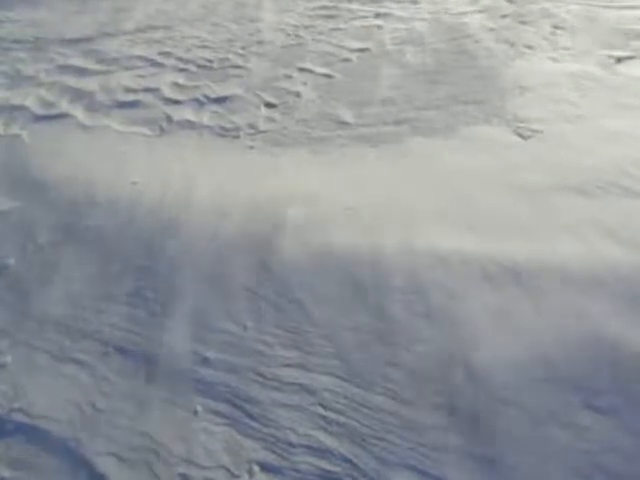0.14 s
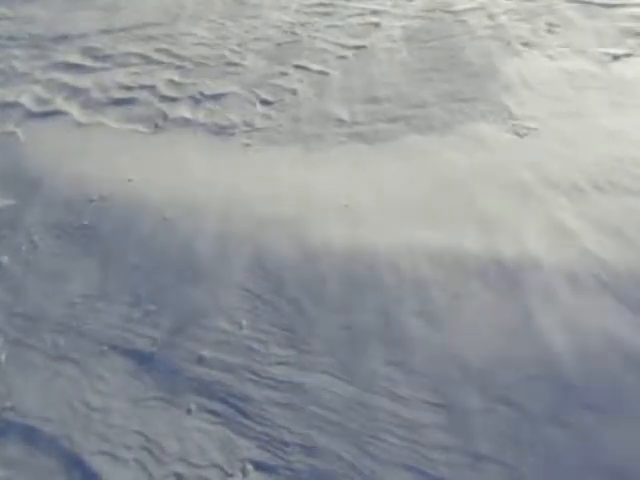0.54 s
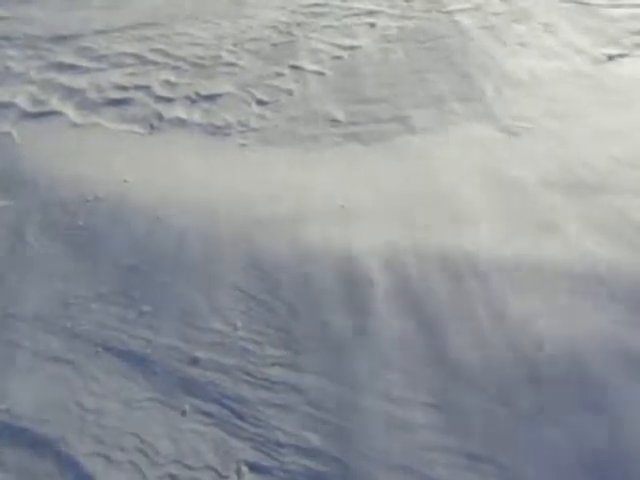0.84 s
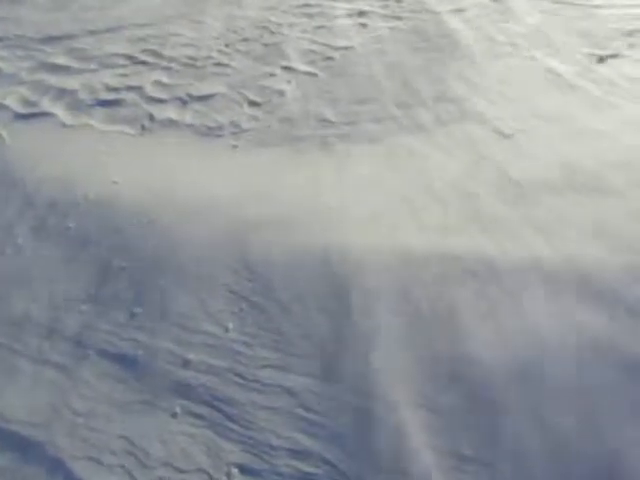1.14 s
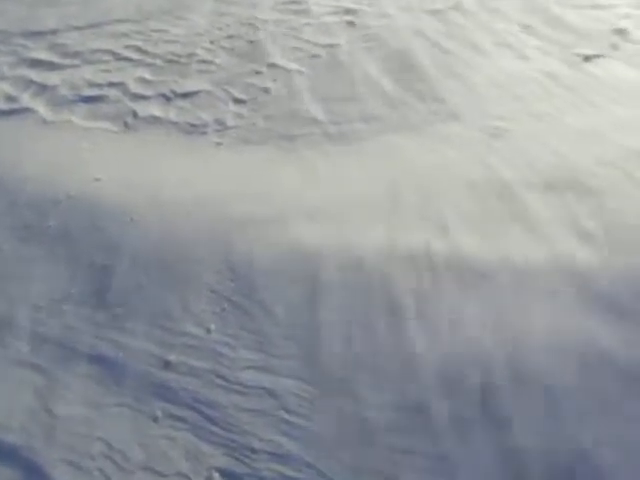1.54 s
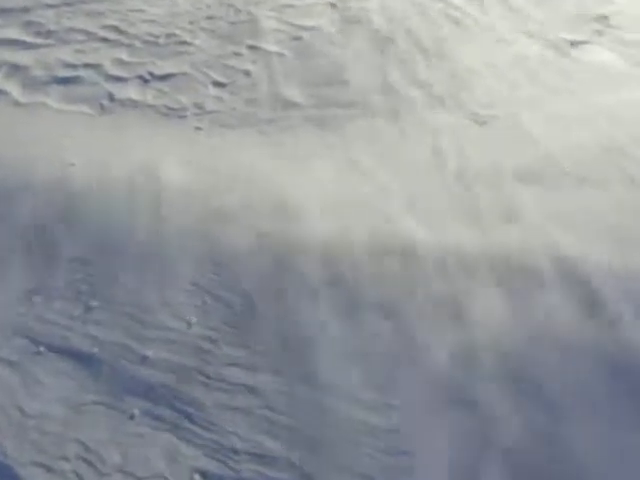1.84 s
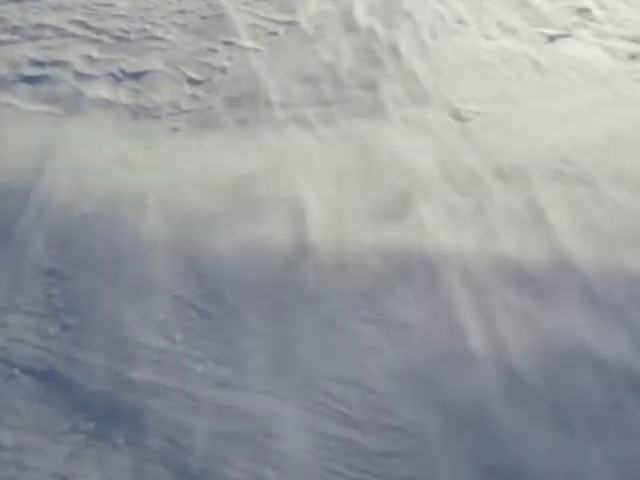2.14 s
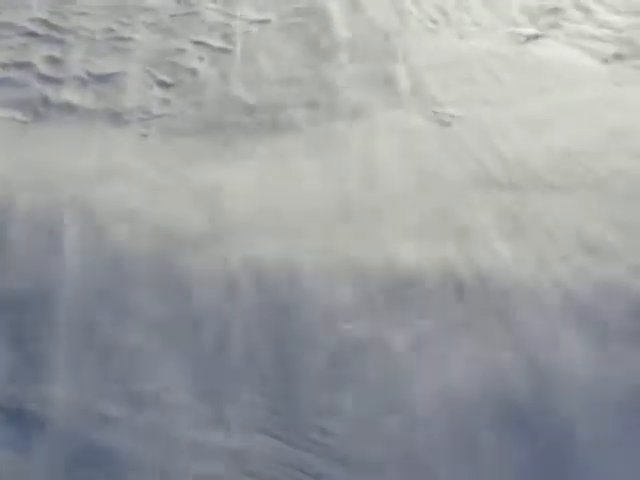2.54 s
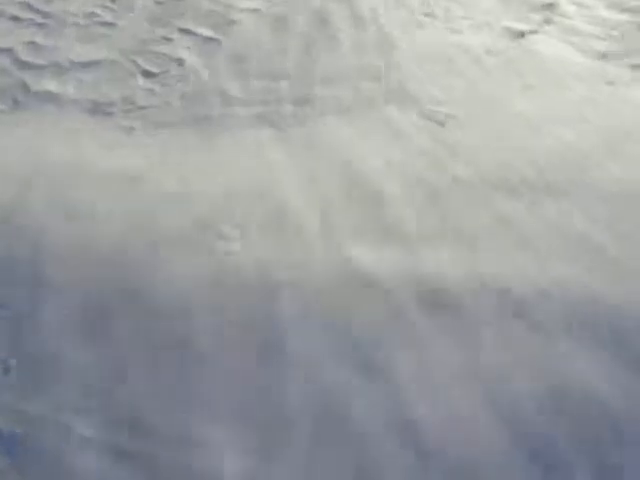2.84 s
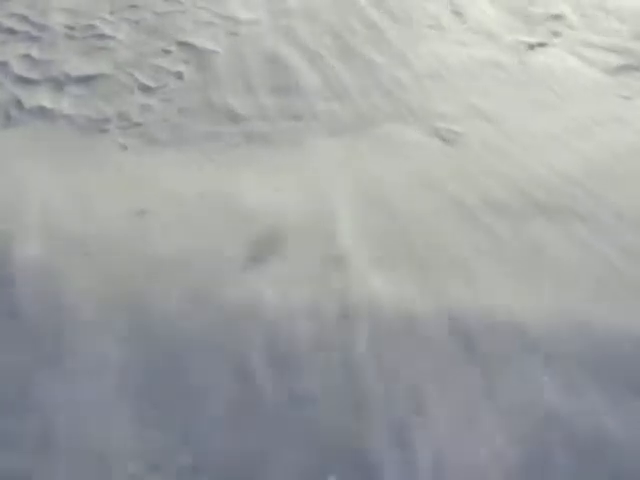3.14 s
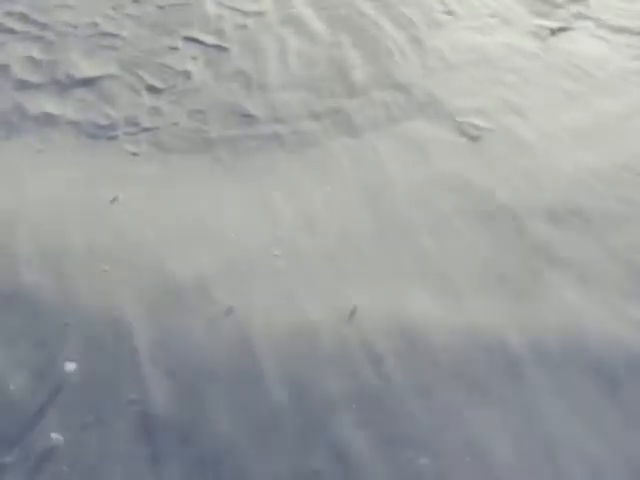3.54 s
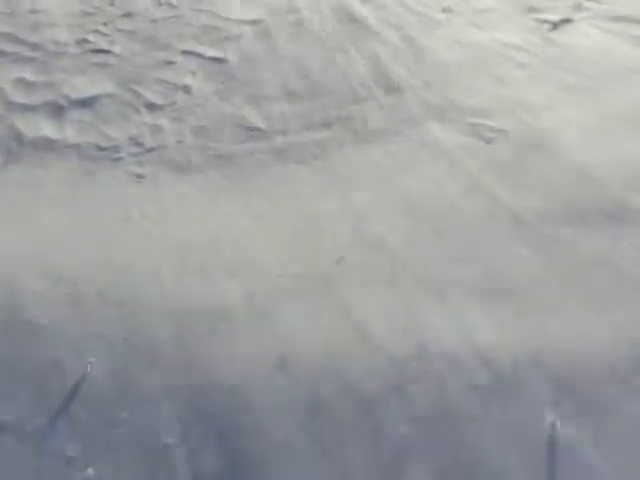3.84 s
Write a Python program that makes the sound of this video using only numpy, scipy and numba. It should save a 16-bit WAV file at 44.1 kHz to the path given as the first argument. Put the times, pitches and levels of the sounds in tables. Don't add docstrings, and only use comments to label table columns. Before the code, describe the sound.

Wind strikes a small bare microphone on an open snowfield. From 0 to 1.3 seconds, short low flutters and thumps come unevenly, with brief gaps. From about 1.35 to 1.8 it sinks to weak puffs and faint snow hiss. At 1.83 hard blasts erupt, strongest around 2.26, with overloaded snaps and ticks; brief dips near 2.08 and 2.55, then dense, rasping, rumbling buffeting from 2.8 until the end at 4.

```python
import sys
import numpy as np
from scipy import signal
from scipy.fft import rfft, irfft
from scipy.io import wavfile
from scipy.ndimage import uniform_filter1d
from numba import njit

SR = 44100
rng = np.random.default_rng(int(sys.argv[2]) if len(sys.argv) > 2 else 0)


def decibels_to_gain(level_db):
    exponent = np.asarray(level_db, float) / 20
    return 10 ** exponent


def master_out(mix):
    frames = np.transpose(np.atleast_2d(mix))
    ceiling = np.clip(frames, -1, 1)
    pcm = np.round(ceiling * 32767).astype(np.int16)
    wavfile.write(sys.argv[1], SR, pcm)


N = 176400
MIDDLE_PUSH_DB = -19.5


def rms_one(x):
    return x / np.sqrt(np.mean(x ** 2) + 1e-20)


def drift(rate_hz):
    r = np.exp(-2 * np.pi * rate_hz / SR)
    settle = 8000
    wander = signal.lfilter([1], [1, -2 * r, r * r], rng.standard_normal(N + settle))
    return rms_one(wander[settle:])


def cut(x, hz, kind, order=1):
    return signal.sosfilt(signal.butter(order, hz, kind, fs=SR, output="sos"), x)


@njit
def moving_pole(x, share):
    y, state = np.empty_like(x), 0.
    for i in range(len(x)):
        state += share[i] * (x[i] - state)
        y[i] = state
    return y


def pole_share(corner_hz):
    return 1 - np.exp(-2 * np.pi * corner_hz / SR)


def push():
    # time_s, level_db
    steady_wind = [(0, -26.5), (.12, -27), (.3, -32.5), (.5, -77.5), (.73, -30.5), (1.1, -30.5),
                   (1.22, -27.5), (1.45, -40), (1.63, -38), (1.82, -42), (2.0, -34), (2.42, -26),
                   (2.6, -25.5), (2.81, -29), (3.05, -30), (3.32, -21), (3.65, -22), (4.0, -22.5)]
    # start_s, peak_db, length_s, brightness_ratio
    eddies = [(0.03, -17, 0.009, 0.9), (0.079, -11, 0.018, 1), (0.114, -11, 0.009, 0.88),
              (0.155, -12, 0.015, 1), (0.178, -9.5, 0.008, 0.7), (0.197, -18, 0.008, 0.7),
              (0.241, -10, 0.013, 1), (0.278, -16, 0.008, 0.82), (0.315, -25, 0.011, 1.45),
              (0.378, -25, 0.047, 1.1), (0.466, -19.5, 0.014, 0.83), (0.504, -14, 0.02, 0.75),
              (0.541, -19, 0.015, 0.8), (0.559, -7, 0.018, 0.8), (0.58, -8, 0.02, 0.99),
              (0.612, -16, 0.01, 0.8), (0.643, -18, 0.006, 1), (0.662, -20, 0.015, 0.7),
              (0.709, -23, 0.006, 0.8), (0.728, -17, 0.018, 0.8), (0.758, -19, 0.008, 1.1),
              (0.797, -10, 0.035, 0.8), (0.845, -15, 0.018, 1.02), (0.869, -13, 0.016, 0.9),
              (0.902, -10.5, 0.018, 0.7), (0.929, -15.5, 0.036, 0.95), (1.011, -6, 0.0067, 0.47),
              (1.129, -14, 0.041, 0.56), (1.213, -7, 0.013, 0.59), (1.226, -8, 0.027, 0.8),
              (1.286, -14, 0.013, 0.7), (1.264, -12, 0.011, 1.1), (1.348, -24, 0.022, 0.9),
              (1.474, -23, 0.022, 0.9), (1.574, -24, 0.012, 0.9), (1.636, -20, 0.018, 0.6),
              (1.754, -22, 0.026, 0.6),
              (1.83, -10, 0.017, 0.75), (1.842, -4.5, 0.024, 0.7), (1.875, -4.5, 0.03, 0.83),
                     (1.891, -4.5, 0.0071, 2.54), (1.921, -11.5, 0.022, 1.5), (1.934, -6, 0.0094, 0.88),
                     (1.968, -20.5, 0.021, 1.96), (2.002, -20, 0.03, 1.53), (2.132, -15, 0.0039, 0.85),
                     (2.164, -17, 0.013, 1.1), (2.184, -6, 0.0067, 0.64), (2.208, -11.5, 0.0081, 0.39),
                     (2.259, 1.5, 0.014, 0.3), (2.276, -3.5, 0.016, 1.16), (2.296, -3, 0.013, 0.32),
                     (2.318, -5, 0.0057, 1.16), (2.376, -15, 0.0079, 1.3), (2.421, -9, 0.012, 0.86),
                     (2.463, -3, 0.0066, 0.57), (2.476, -12.5, 0.0074, 1), (2.512, -56, 0.026, 6.1),
                     (2.595, -20, 0.0056, 0.58), (2.611, -6.5, 0.0088, 0.53), (2.639, -3.5, 0.0025, 0.57),
                     (2.682, -12.5, 0.01, 0.44), (2.708, -3.5, 0.011, 0.57), (2.797, -11.5, 0.023, 1.03),
                     (2.82, -10.5, 0.014, 0.65), (2.855, -7, 0.025, 0.71), (2.888, -7.5, 0.012, 0.75),
                     (2.905, -6.5, 0.024, 0.51), (2.939, -5, 0.018, 0.84), (2.967, -11.5, 0.011, 0.87),
                     (2.994, -1.5, 0.005, 0.57),
              (3.047, -2.5, 0.013, 0.48), (3.097, -7, 0.016, 0.29), (3.119, -7, 0.0062, 1.03),
                   (3.132, -5, 0.0049, 0.36), (3.173, -9.5, 0.02, 0.51), (3.203, -6, 0.0092, 0.38),
                   (3.216, -14, 0.015, 0.73), (3.25, -9, 0.011, 0.41), (3.267, -4.5, 0.016, 0.67),
                   (3.301, -4.5, 0.013, 0.35), (3.367, -8.5, 0.017, 0.52), (3.395, -13.5, 0.033, 1.7),
                   (3.419, 1, 0.01, 0.43), (3.434, -29, 0.021, 1.9), (3.444, -12, 0.011, 0.96),
                   (3.474, -8.5, 0.011, 0.54), (3.506, -9, 0.0067, 1.26), (3.537, -14, 0.017, 1.9),
                   (3.55, -8, 0.016, 1.01), (3.578, -18, 0.0054, 3.3), (3.593, -6, 0.013, 1.22),
                   (3.615, -5.5, 0.013, 0.59), (3.656, -7.5, 0.018, 0.42), (3.695, -13, 0.015, 1.05),
                   (3.72, -10, 0.013, 0.57), (3.741, -8.5, 0.0095, 0.66), (3.773, -20.5, 0.006, 0.76),
                   (3.794, -12, 0.0053, 0.83), (3.803, -8, 0.0084, 0.71), (3.811, -6, 0.0089, 0.66),
                   (3.864, -13, 0.014, 0.31), (3.888, -8.5, 0.0044, 1.13), (3.902, -5.5, 0.0088, 0.4),
                   (3.921, -13.5, 0.0064, 1.63), (3.98, -2.5, 0.012, 0.62)]
    # middle_s, depth_db, half_length_s
    calms = [(1.089, 20, 0.012), (2.077, 17, 0.0077), (2.562, 23, 0.012), (2.662, 8, 0.024),
             (2.733, 20.5, 0.012), (3.29, 12, 0.0087), (3.497, 20, 0.019), (3.636, 8.5, 0.016),
             (3.788, 13.5, 0.0035), (3.831, 10, 0.0083), (3.853, 20, 0.011), (3.887, 12, 0.0093)]
    # rate_hz, spread_db
    unevenness = [
        (15, .6),
        (50, 1.5),
        (190, 4.0),
    ]
    crest_db = 5.5
    lump_top_db = 4

    t = np.arange(N) / SR
    calm_db = sum(depth_db * np.exp(-((t - s) / half) ** 2) for s, depth_db, half in calms)
    power = decibels_to_gain(2 * (np.interp(t, *np.transpose(steady_wind)) - calm_db))
    bright = np.zeros(N)
    for s, db, length, sharp in eddies:
        near = slice(int(s * SR), int((s + 4 * length) * SR) + 2)
        age = np.maximum(t[near] - s, 0)
        rise_s = .001 + .1 * length
        rise = (1 - np.exp(-age / rise_s)) ** 2
        burst = decibels_to_gain(2 * (db - crest_db)) * rise * np.exp(-(age / length) ** 3)
        power[near] += burst
        bright[near] += burst * 20 * np.log10(max(sharp, .1))

    lumps = sum(spread_db * drift(rate_hz) for rate_hz, spread_db in unevenness)
    lumps = np.where(lumps > 0, lump_top_db * np.tanh(lumps / lump_top_db), lumps)
    return 10 * np.log10(power), bright / power, lumps


def flutter(push_db, bright_db):
    extra_db = push_db - MIDDLE_PUSH_DB
    corner_hz = np.clip(490 * decibels_to_gain(.48 * extra_db + bright_db), 40, 5000)
    stages = [rng.standard_normal(N) * np.sqrt(SR / corner_hz / 2)]
    for ratio in (1, 4.1, 4.1, 4.27, 4.27):
        stages.append(moving_pole(stages[-1], pole_share(ratio * corner_hz)))

    gale_db = uniform_filter1d(push_db, size=int(.8 * SR)) - MIDDLE_PUSH_DB
    rasp_db = np.minimum(-3 + gale_db + .27 * extra_db + bright_db, -1)
    x = stages[5] + decibels_to_gain(rasp_db) * stages[3]

    evenness, even_s = .6, .008
    nearby_power = np.abs(uniform_filter1d(x ** 2, size=int(even_s * SR)) + 0.0033)
    x = decibels_to_gain(push_db) * x / nearby_power ** (evenness / 2)

    skirt = pole_share(8 * corner_hz * decibels_to_gain(.9 * gale_db))
    for _ in range(3):
        x = moving_pole(x, skirt)
    return x


def cracks():
    # start_s, peak_db, cycle_s
    snaps = [(0.5595, -1, 0.0016), (1.239, 5, 0.0012), (1.245, -1, 0.0012), (1.8775, 2, 0.0014),
             (1.891, 3, 0.0011), (2.275, 3, 0.0016), (2.712, 6, 0.0008), (2.907, 2, 0.0011),
             (2.947, 1, 0.001), (2.997, -1, 0.0014), (3.051, -1, 0.0012), (3.396, 0, 0.0012),
             (3.839, -5, 0.002), (3.905, -1, 0.0016)]
    t, out = np.arange(N) / SR, np.zeros(N)
    for s, db, cycle in snaps:
        near = slice(int(s * SR), int((s + 3 * cycle) * SR))
        age = np.maximum(t[near] - s, 0) / cycle
        swell = 8.4 * age ** 2 * np.exp(-(1.5 * age) ** 2)
        out[near] -= decibels_to_gain(db - 5.5) * np.sin(2 * np.pi * age) * swell
    return cut(out, 3670, "low")


def ticks():
    # start_s, peak_db, length_s
    slivers = [(1.24, -34, 0.00042), (1.247, -34, 0.0004), (1.268, -32.5, 0.0004), (1.8768, -34, 0.0019),
               (1.8891, -31, 0.00058), (1.8928, -26.5, 0.001), (1.8984, -32, 0.00053), (1.902, -33, 0.001),
               (1.941, -37.5, 0.00068), (2.2613, -44, 0.00088), (2.2728, -34, 0.0016),
               (2.2786, -24, 0.0019), (2.3, -42, 0.0021), (2.3057, -38, 0.0021), (2.3211, -40, 0.00087),
               (2.4674, -31, 0.00089), (2.476, -40, 0.00072), (2.597, -46.5, 0.00097),
               (2.6154, -32, 0.00041), (2.7116, -23, 0.00084), (2.8086, -46, 0.00044),
               (2.8604, -36, 0.00085), (2.887, -36, 0.0014), (2.9076, -26.5, 0.00066), (2.94, -41, 0.00087),
               (2.9453, -24, 0.00098), (2.966, -48, 0.0012), (2.9983, -33, 0.00085), (3.0523, -32.5, 0.001),
               (3.1243, -37, 0.0004), (3.159, -44, 0.00073), (3.175, -46.5, 0.00053),
               (3.181, -43.5, 0.0011), (3.2026, -43.5, 0.0018), (3.267, -31.5, 0.0012),
               (3.2784, -34.5, 0.0016), (3.31, -43, 0.0027), (3.3034, -36, 0.0022), (3.3962, -28, 0.00097),
               (3.3985, -25, 0.002), (3.419, -34, 0.0017), (3.4338, -34, 0.0029), (3.477, -45, 0.0014),
               (3.506, -27, 0.00056), (3.5359, -25.5, 0.0015), (3.5422, -25, 0.002), (3.5756, -32.5, 0.002),
               (3.6006, -24, 0.00058), (3.623, -45, 0.0012), (3.669, -31.5, 0.00083),
               (3.7258, -31.5, 0.0012), (3.752, -39, 0.00087), (3.7745, -45, 0.00068),
               (3.805, -30.5, 0.0014), (3.8116, -32.5, 0.0011), (3.8675, -47, 0.0005),
               (3.8956, -31.5, 0.0004), (3.9016, -38.5, 0.003), (3.9234, -39.5, 0.0012),
               (3.9804, -32.5, 0.0011)]
    low_hz, high_hz = 890, 2052
    full_edge = 0.049
    t, gate = np.arange(N) / SR, np.zeros(N)
    for s, db, length in slivers:
        near = slice(int(s * SR), int((s + 5 * length) * SR))
        age = np.maximum(t[near] - s, 0) / length
        gate[near] += decibels_to_gain(db + 6.5) * np.e * age * np.exp(-age)
    grain = cut(cut(rng.standard_normal(N), high_hz, "low", order=2), low_hz, "high")
    torn = gate * rms_one(grain)
    dull = cut(torn, 2 * high_hz, "low", order=2)
    return dull + torn * np.minimum(gate / full_edge, 1) / 2


def rumble(push_db):
    top_hz = 173
    level_db = MIDDLE_PUSH_DB + .71 * (push_db - MIDDLE_PUSH_DB) - .5
    pressure = rms_one(cut(rng.standard_normal(N), top_hz, "low", order=2))
    return cut(decibels_to_gain(level_db) * pressure, 2 * top_hz, "low")


def snow():
    # pitch_hz, level_db (per Hz)
    hiss_colour = [(200, -2), (1000, -2), (2200, -10), (3200, -15), (5000, -20), (8500, -22), (13000, -30),
                   (16000, -40)]
    hz, db = np.transpose(hiss_colour)
    bins_hz = np.arange(N // 2 + 1) * SR / N
    colour = decibels_to_gain(np.interp(np.log(bins_hz + 1), np.log(hz), db))
    level = decibels_to_gain(-56.5 + .7 * drift(2.4))
    return level * rms_one(irfft(rfft(rng.standard_normal(N)) * colour, N))


def ducking(x):
    start_above_db, slope = -18, .9
    recover_db_per_s, already_over_db = 12, 7
    ramp = recover_db_per_s * np.arange(N) / SR
    loudness_db = 10 * np.log10(np.abs(uniform_filter1d(x ** 2, size=441)) + 1e-12)
    over = np.maximum(loudness_db - start_above_db, 0)
    held = np.maximum(np.maximum.accumulate(over + ramp), already_over_db)
    return decibels_to_gain(-slope * (held - ramp))


def scene():
    push_db, bright_db, lumps = push()
    wind = cut(flutter(push_db + lumps, bright_db), 6500, "low")
    wind = wind + rumble(push_db + .5 * lumps) + cracks() + ticks()
    wind = cut(wind, 129, "high")
    wind = cut(wind, 26, "high", order=2)
    return (wind + ducking(wind) * snow())[None]


def roll_off(x):
    return signal.sosfilt(signal.butter(12, 15800, fs=SR, output="sos"), x)


def record(dry):
    overloaded = np.clip(dry, -1, 1)
    top_cut = signal.cheby2(10, 40, 15800, fs=SR, output="sos")
    mix = signal.sosfilt(top_cut, overloaded)
    return roll_off(mix)


dry = scene()
out = record(dry)
master_out(out)
```